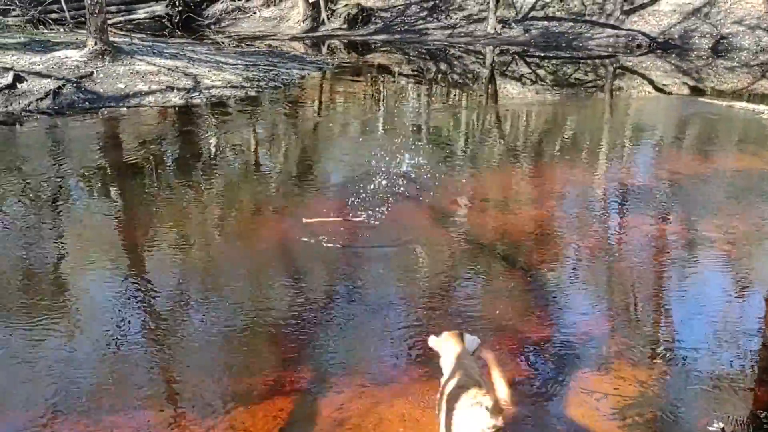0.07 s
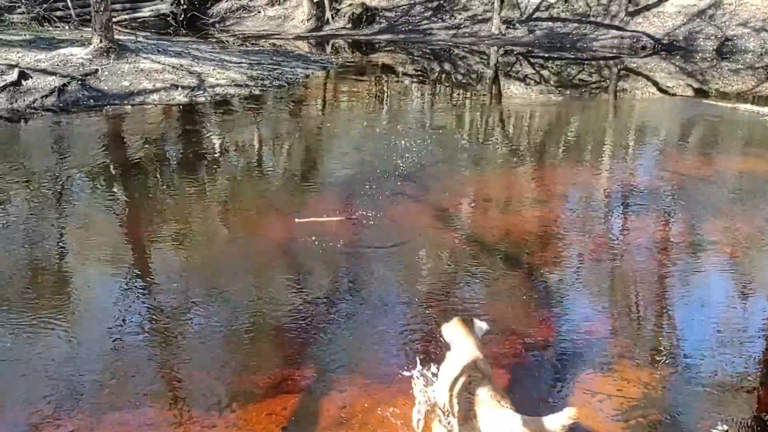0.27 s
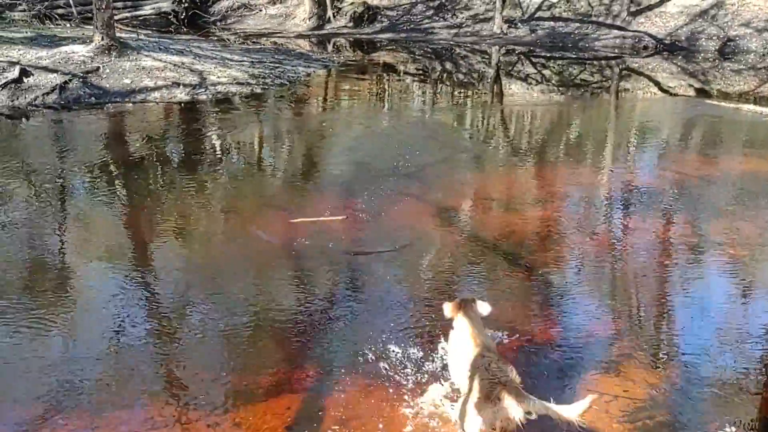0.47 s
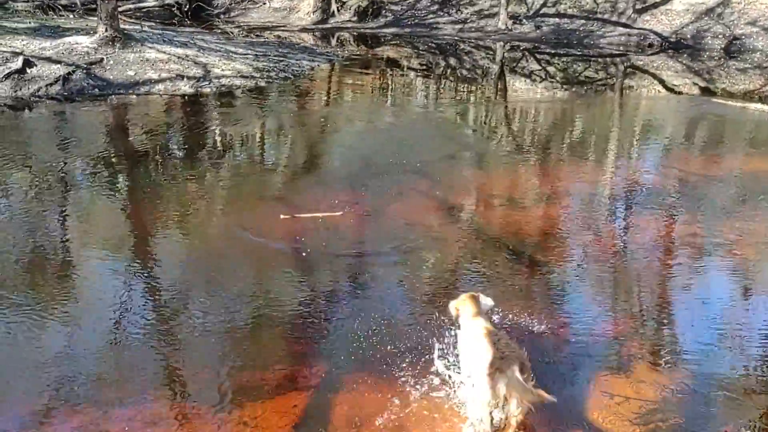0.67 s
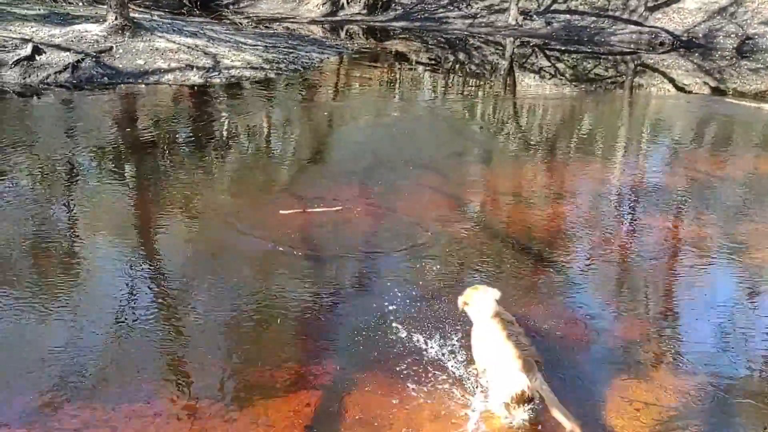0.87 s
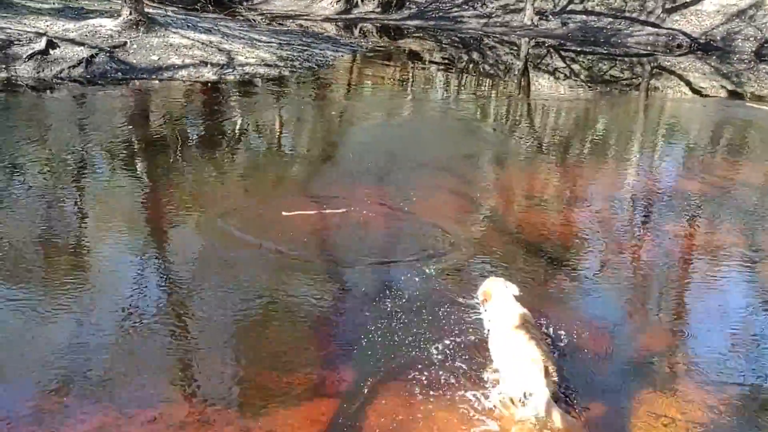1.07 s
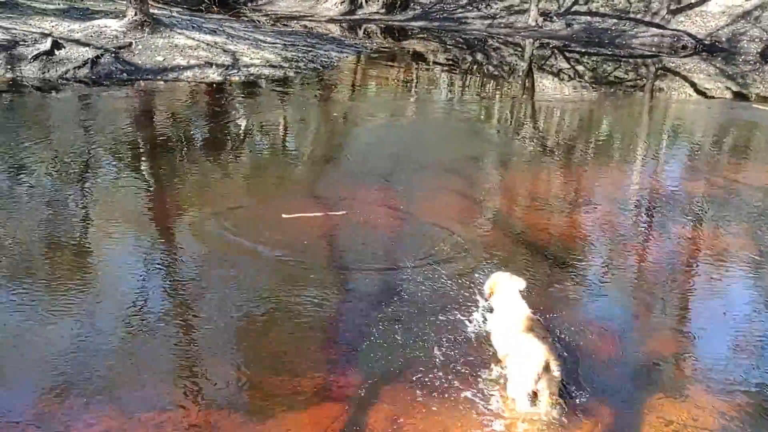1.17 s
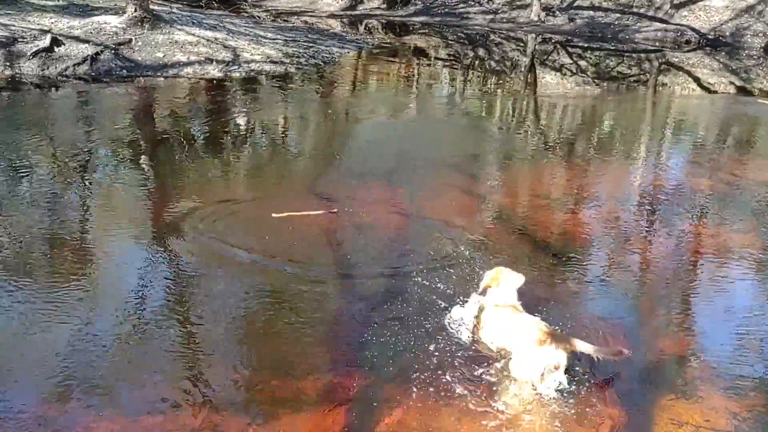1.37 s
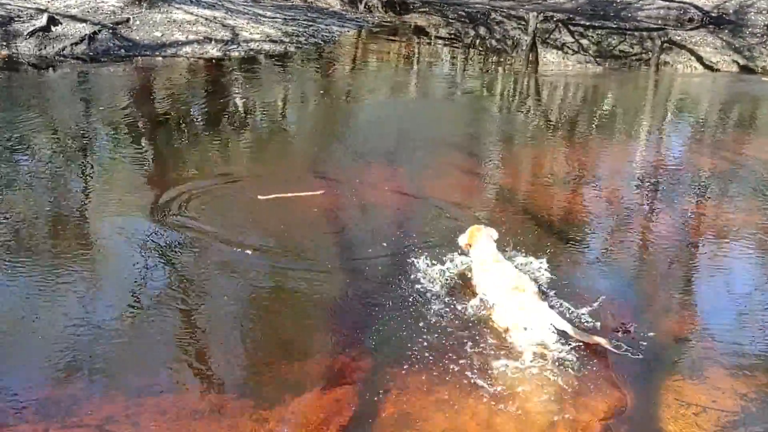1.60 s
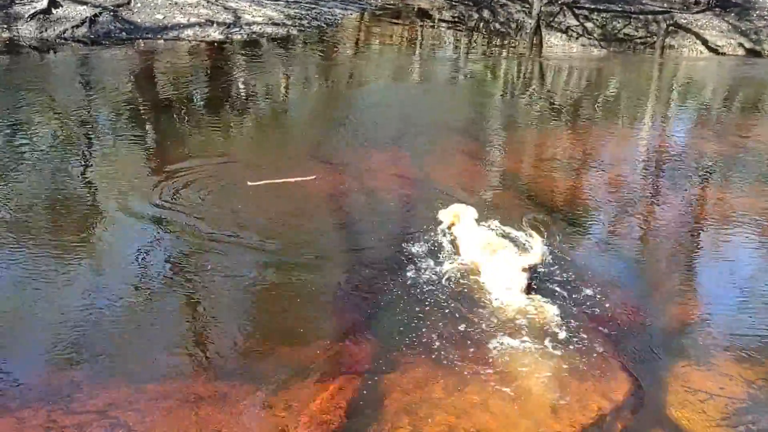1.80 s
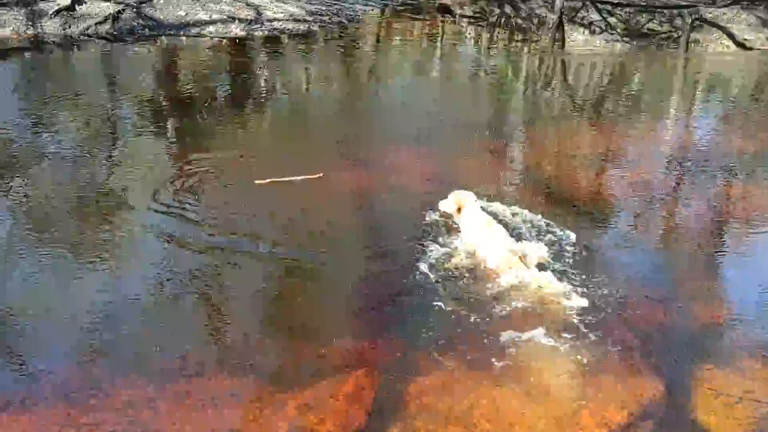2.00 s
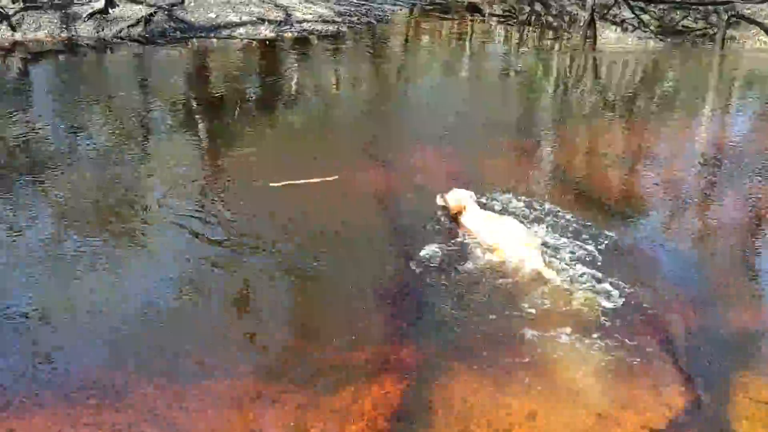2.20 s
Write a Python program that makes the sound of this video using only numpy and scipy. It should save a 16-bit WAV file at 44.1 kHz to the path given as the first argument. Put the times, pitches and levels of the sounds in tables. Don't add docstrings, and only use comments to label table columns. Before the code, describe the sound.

A dog splashes into a shallow river, one sharp smack first, then churning, bubbling paddling strokes

```python
import sys
import numpy as np
from scipy import signal
from scipy.io import wavfile

SR = 44100
rng = np.random.default_rng(int(sys.argv[2]) if len(sys.argv) > 2 else 0)


def volts_from_decibels(level):
    exponent = np.asarray(level, float) / 20
    return 10 ** exponent


def digitize_waveform(pressure):
    field = np.atleast_2d(pressure).T
    bounded = np.clip(field, -1, 1)
    quanta = np.round(bounded * 32767).astype(np.int16)
    wavfile.write(sys.argv[1], SR, quanta)


N = 99225

BUBBLE_RISE, BUBBLE_ONSET_CYCLES = 0.011, 2.24
CLEAR_RISE, CLEAR_ONSET_CYCLES = 0.0057, 1.18
SPLATTER_DB, SPLATTER_T60_S = -14.5, 0.33
POCKET_FADE = 1.39


def rms_one(x):
    return x / np.sqrt(np.mean(x ** 2) + 1e-20)


def band(x, low_hz, high_hz, order=2):
    return signal.sosfilt(signal.butter(order, [low_hz, high_hz], "band", fs=SR, output="sos"), x)


def drift(rate_hz):
    pole = np.exp(-2 * np.pi * rate_hz / SR)
    noise = rng.standard_normal(N + SR)
    smooth = signal.lfilter([1], [1, -2 * pole, pole * pole], noise)
    return rms_one(smooth[SR:])


def hiss(low_hz, high_hz, flicker_db, rate_hz):
    noise = rms_one(band(rng.standard_normal(N), low_hz, high_hz, order=3))
    return noise * volts_from_decibels(flicker_db * drift(rate_hz))


def add(out, s, grains):
    start = (np.asarray(s) * SR).astype(int)
    at = start[:, None] + np.arange(grains.shape[1])
    np.add.at(out, np.minimum(at, N), grains)


def ringing(s, db, hz, cycles, rise, onset, size, fade=1):
    out = np.zeros(N + 1)
    n = np.outer(hz, np.arange(size) / SR)
    swell = 1 - np.exp(-n / np.reshape(onset, (-1, 1)))
    decay = volts_from_decibels(-60 * (n / np.reshape(cycles, (-1, 1))) ** fade)
    shape = swell * decay
    shape /= shape.max(axis=1, keepdims=True)
    tone = np.sin(2 * np.pi * (n + rise * n * n / 2))
    add(out, s, volts_from_decibels(db)[:, None] * shape * tone)
    return out[:N]


def bursts(s, db, rise_s, t60, tail_db, tail_t60, low_hz=600, high_hz=9500):
    crackle_db, crackle_s = 3.5, 0.0011
    out = np.zeros(N + 1)
    t = np.arange(SR // 4) / SR
    decay = volts_from_decibels(-60 * t / t60[:, None]) + volts_from_decibels(tail_db - 60 * t / tail_t60)
    envelope = (1 - np.exp(-t / rise_s)) * decay
    envelope /= envelope.max(axis=1, keepdims=True)
    noise, lumps = rng.standard_normal((len(s), 2, len(t))).transpose(1, 0, 2)
    lumps = signal.lfilter([1], [1, -np.exp(-1 / (crackle_s * SR))], lumps)
    lumps = volts_from_decibels(crackle_db * rms_one(lumps))
    add(out, s, volts_from_decibels(db)[:, None] * band(envelope * lumps * noise, low_hz, high_hz))
    return out[:N]


def swarm(count, low_hz, high_hz, cycles, spread_db, size):
    u = rng.random((count, 4))
    s = u[:, 0] * N / SR
    hz = low_hz * (high_hz / low_hz) ** u[:, 1]
    db = -spread_db * np.log(u[:, 2] + 0.008)
    cycles = cycles * (0.5 + u[:, 3])
    return rms_one(ringing(s, db, hz, cycles, BUBBLE_RISE, BUBBLE_ONSET_CYCLES, size))


def stirred_water():
    # (time [s], spray falling back [dB], churn of bubbles [dB], fine mist [dB])
    stirring = [(0, -51.5, -59, -63), (0.192, -54, -73.5, -65.5), (0.221, -41.5, -54, -56.5),
                (.33, -50, -56, -62), (.36, -52.5, -70.5, -60), (.52, -50, -52.5, -58.5),
                (0.679, -45.5, -55.5, -54), (0.802, -49, -48, -60.5), (.94, -44.5, -47, -58.5),
                (1.231, -50.5, -46.5, -63.5), (1.27, -48, -52.5, -53.5), (1.401, -48, -42.5, -61),
                (1.45, -47, -42.5, -59.5), (1.66, -43.5, -43, -53), (1.83, -44, -40, -57.5),
                (1.87, -49.5, -43.5, -63), (1.96, -46.5, -42.5, -58.5), (2.25, -52, -51.5, -62)]
    s, *levels = np.transpose(stirring)
    spray, churn, mist = (volts_from_decibels(np.interp(np.arange(N) / SR, s, v)) for v in levels)

    fizz = swarm(count=3500, low_hz=1450, high_hz=4017, cycles=35, spread_db=2.3, size=900)
    foam = hiss(1120, 4350, flicker_db=1.5, rate_hz=27)
    falling = volts_from_decibels(-1) * fizz + volts_from_decibels(-5) * foam

    drops = swarm(count=4000, low_hz=3930, high_hz=8800, cycles=19, spread_db=4, size=300)
    fine = hiss(4700, 10000, flicker_db=2.6, rate_hz=37)
    misting = volts_from_decibels(5.5) * drops + volts_from_decibels(8.5) * fine

    crowd = swarm(count=1100, low_hz=421, high_hz=1135, cycles=16.2, spread_db=1, size=2000)
    slosh = swarm(count=400, low_hz=170, high_hz=464, cycles=5.9, spread_db=-2.5, size=2500)
    wash = hiss(392, 1196, flicker_db=1.5, rate_hz=19)
    churning = volts_from_decibels(-5) * crowd + volts_from_decibels(-16.5) * slosh + volts_from_decibels(-5) * wash
    return spray * falling + mist * misting + churn * churning


def droplets():
    # (time [s], peak level [dB], pitch [Hz])
    landings = [(.026, -41.5, 2610), (.215, -39, 1420), (.271, -34, 2460), (.293, -43, 1500),
                (.314, -38, 2580), (.39, -39.5, 2520), (.415, -46.5, 1450), (.526, -39, 2390),
                (.857, -44, 2460), (0.923, -36.5, 1450), (.935, -35, 1990), (.942, -36, 3090),
                (1.059, -38.5, 3050), (1.285, -37, 1890), (1.464, -37, 3050), (2.12, -46, 2020),
                (2.214, -44.5, 1330)]
    s, db, hz = np.transpose(landings)
    return ringing(s, db, hz, 56, CLEAR_RISE / 4, CLEAR_ONSET_CYCLES, size=1500)


def slaps():
    # (time [s], peak level [dB], pitch of the slap [Hz], dying time [ms])
    paw_hits = [(0.0273, -43.5, 2720, 35), (0.1056, -33, 2710, 35), (0.181, -42, 2960, 35),
                (0.2082, -26.5, 2720, 35), (0.315, -35.5, 2680, 35), (0.3654, -37, 2450, 35),
                (0.4574, -45, 3280, 35), (0.5562, -24.5, 2530, 35), (0.603, -31.5, 2250, 35),
                (0.6529, -33.5, 3220, 35), (0.683, -31, 2420, 35), (0.834, -34.5, 2410, 35),
                (0.9218, -36, 1900, 35), (1.1318, -33, 2990, 35), (1.2557, -30, 3420, 35),
                (1.3026, -43.5, 3200, 35), (1.433, -29.5, 2290, 35), (1.454, -30, 3120, 35),
                (1.4744, -32.5, 2400, 35), (1.4905, -32.5, 2190, 35), (1.604, -33.5, 2180, 35),
                (1.6416, -28.5, 2540, 35), (1.6729, -31, 2190, 35), (1.8266, -34, 2150, 35),
                (1.896, -36, 2830, 35), (1.941, -32.5, 2100, 35), (1.9607, -32.5, 2200, 35),
                (2.1221, -38, 2000, 35)]
    s, db, hz, ms = np.transpose(paw_hits)
    ring_t60_s = 0.0085
    noise = bursts(s, db - 3, 0.0025, ms / 1000, SPLATTER_DB, SPLATTER_T60_S, low_hz=1000)
    ring = ringing(s, db - 6, hz, ring_t60_s * hz, 0, BUBBLE_ONSET_CYCLES, size=1500)
    return noise + ring


def ticks():
    # (time [s], peak level [dB])
    strikes = [(0.074, -36.5), (0.136, -37.5), (0.391, -34), (0.527, -42), (0.597, -32.5), (0.642, -43),
               (0.75, -31), (0.856, -32), (0.903, -37), (0.92, -29.5), (0.996, -35), (1.028, -35),
               (1.072, -28), (1.392, -38.5), (1.64, -35), (1.651, -25), (1.66, -23.5), (1.671, -25),
               (1.723, -32), (1.825, -21.5), (1.96, -33), (2.002, -38), (2.05, -30), (2.23, -35)]
    s, db = np.transpose(strikes)
    splatter = bursts(s, db - 7.5, 0.00021, 0.008 + 0 * s, tail_db=-9.5, tail_t60=0.05,
                      low_hz=700, high_hz=4500)
    hz = 1720 * rng.uniform(0.64, 1.53, len(s))
    kick = ringing(s, db - 2, hz, cycles=3.5, rise=0, onset=0.16, size=300)
    return splatter + kick


def bubbles():
    # (time [s], peak level [dB], pitch [Hz], ringing time [cycles])
    singles = [(0.208, -32.5, 1000, 18), (0.228, -30, 920, 20), (0.283, -42, 894, 20),
               (0.311, -35.5, 1470, 21), (0.492, -45, 555, 36), (0.597, -33, 1440, 54),
               (0.626, -32.5, 1390, 17), (0.66, -33.5, 967, 33), (0.757, -39, 623, 20),
               (0.819, -36.5, 927, 13), (0.868, -34.5, 499, 17), (0.9, -37, 1020, 21),
               (0.92, -28.5, 830, 6.9), (0.934, -29, 850, 10), (0.946, -36, 930, 10), (1.057, -35, 950, 21),
               (1.187, -36, 896, 22), (1.241, -34, 810, 9.4), (1.34, -34.5, 1415, 35),
               (1.374, -41, 488, 22), (1.402, -35, 515, 20), (1.632, -31, 530, 20), (1.647, -31.5, 670, 39),
               (1.67, -30.5, 880, 7), (1.761, -37.5, 972, 70), (1.808, -29, 567, 9.4),
               (1.825, -35.5, 700, 16), (1.877, -33.5, 408, 7.1), (1.964, -34, 605, 5.9),
               (2.071, -38, 744, 8.2), (0.104, -51.5, 1000, 13), (0.183, -41.5, 2910, 41),
               (.587, -41.5, 954, 20), (.623, -39, 780, 18), (1.004, -45.5, 974, 32),
               (1.026, -39, 910, 7.2), (1.077, -40.5, 2860, 74), (1.093, -43.5, 509, 34),
               (1.28, -37.5, 860, 16), (1.375, -39.5, 1010, 33), (1.489, -32.5, 1375, 33),
               (1.66, -35.5, 817, 15), (1.69, -36, 402, 13), (1.735, -38.5, 923, 32), (1.947, -38, 434, 11),
               (1.966, -38, 1750, 30), (2.145, -39, 1315, 38), (2.173, -44, 795, 18), (2.226, -49, 886, 23)]
    # (time [s], peak level [dB], pitch [Hz], ringing time [cycles])
    tiny_drop = [
        (1.0256, -25, 5480, 28),
    ]
    brood_db, brood_s, brood_octaves = -9.5, 0.017, 0.87
    s, db, hz, cycles = np.transpose(singles)
    start_hz = hz / (1 + 5 * CLEAR_RISE)
    out = ringing(s, db, start_hz, cycles, CLEAR_RISE, CLEAR_ONSET_CYCLES, size=3000)
    for delay, weakness, smallness in rng.random((len(s), 4, 3)).transpose(1, 2, 0):
        brood_hz = hz * 2 ** (brood_octaves * (2 * smallness - 0.7))
        out += ringing(s + brood_s * delay, db + brood_db * (0.5 + weakness), brood_hz,
                       cycles, BUBBLE_RISE, BUBBLE_ONSET_CYCLES, size=2000)
    return out + ringing(*np.transpose(tiny_drop), 0, BUBBLE_ONSET_CYCLES, size=1000)


def gulps():
    # (time [s], peak level [dB], pitch [Hz], decay time T60 [s])
    pockets = [(0.236, -45.5, 117, 0.063), (0.283, -50, 296, .1), (.455, -50, 153, 0.02),
               (.42, -59, 260, .05), (0.599, -47, 220, 0.061), (.685, -59, 151, .05),
               (.622, -43, 156, 0.079), (0.821, -34.5, 252, 0.048), (0.991, -48.5, 250, 0.06),
               (1.131, -48.5, 259, 0.05), (1.302, -39, 103.7, 0.2), (1.3, -40, 226, 0.023),
               (1.438, -46.5, 149, 0.041), (1.489, -40, 206, 0.012), (1.579, -36.5, 195, 0.078),
               (1.626, -36.5, 218, 0.03), (1.67, -36.5, 250, 0.023), (1.7, -51.5, 150, 0.012),
               (1.821, -42, 250, 0.065), (1.876, -40.5, 235, 0.024), (1.948, -41.5, 170, 0.022),
               (2.046, -46.5, 170, 0.039), (1.99, -48.5, 150, 0.033), (1.925, -44, 230, 0.035),
               (2.088, -51, 260, 0.045), (2.16, -49.5, 303, 0.037)]
    # (time [s], peak level [dB], pitch [Hz], decay time T60 [s])
    shrinking = [
        (0.554, -40, 163, .075),
    ]
    onset_s = 0.0019
    s, db, hz, t60 = np.transpose(pockets)
    thuds = bursts(s, db + 9, onset_s, 0.065 + 0 * s, SPLATTER_DB, SPLATTER_T60_S, low_hz=200, high_hz=1420)
    rings = ringing(s, db, hz, t60 * hz, 0.0057, onset_s * hz, size=12000, fade=POCKET_FADE)
    s, db, hz, t60 = np.transpose(shrinking)
    climbing = ringing(s, db, hz, t60 * hz, 0.047, 0.0033 * hz, size=6000, fade=2.54)
    return thuds + rings + climbing


def smack():
    # (pitch [Hz], level [dB], decay time T60 [ms])
    smack_modes = [
        (1150, -23, 16),
        (2140, -13.5, 8.1),
        (2520, -21.5, 15),
        (3050, -24.5, 12),
        (5900, -10, 4.4),
        (7040, -27, 9.7),
        (7600, -26, 16.6),
    ]
    hit_s, rise_s = 0.2422, 0.0011
    hz, db, ms = np.transpose(smack_modes)
    crack = bursts(np.array([hit_s]), np.array([-12.5]), rise_s, np.array([0.0085]),
                   tail_db=-23.5, tail_t60=0.17, low_hz=900, high_hz=7800)
    rings = ringing(hit_s + 0 * hz, db, hz, ms / 1000 * hz, 0, rise_s * hz, size=2000, fade=POCKET_FADE)
    return crack + rings


def near_paths(water):
    # (time [s], first delay [ms], its level [dB], second delay [ms], its level [dB])
    paths = [
        (0, 1.02, -29, 1.974, -13.5),
        (1.101, 1.342, -15.5, 2.11, -13),
        (2.25, 1.4, -12.5, 2.42, -19.5),
    ]
    s, *columns = np.transpose(paths)
    n = np.arange(N)
    ms_a, db_a, ms_b, db_b = (np.interp(n / SR, s, c) for c in columns)
    first = volts_from_decibels(db_a) * np.interp(n - ms_a * SR / 1000, n, water)
    second = volts_from_decibels(db_b) * np.interp(n - ms_b * SR / 1000, n, water)
    return first + second


def bank_echoes(water):
    # (delay [s], level [dB])
    bank = [
        (.011, -24),
        (.027, -29),
    ]
    dull = band(water, 260, 3800, order=1)
    return sum(volts_from_decibels(db) * np.pad(dull, (int(s * SR), 0))[:N] for s, db in bank)


def woods_air():
    return volts_from_decibels(-69.5) * rms_one(band(rng.standard_normal(N), 25, 250, order=1))


def scene():
    water = stirred_water() + droplets() + slaps() + ticks() + bubbles() + gulps() + smack()
    return (water + near_paths(water) + bank_echoes(water) + woods_air())[None]


def band_limit(x):
    return signal.sosfilt(signal.butter(12, 9040, fs=SR, output="sos"), x)


def record(dry):
    # (centre [Hz], width [Hz], gain [dB])
    housing = [
        (396, 110, -3),
        (1120, 270, -0.5),
        (3014, 930, 5.5),
        (3730, 170, 4.5),
        (4217, 957, -14),
        (5040, 1670, -5.5),
        (5860, 370, -3),
        (7450, 1800, 4),
    ]
    x = signal.sosfilt(signal.butter(2, 77.5, "high", fs=SR, output="sos"), dry)
    x = signal.lfilter(*signal.butter(1, 3740, fs=SR), x)
    for hz, width_hz, db in housing:
        w = 2 * np.pi * hz / SR
        a = np.sqrt(volts_from_decibels(db))
        k = np.sin(w) * width_hz / hz / 2
        middle = -2 * np.cos(w)
        x = signal.lfilter([1 + k * a, middle, 1 - k * a], [1 + k / a, middle, 1 - k / a], x)
    mix = signal.sosfilt(signal.cheby2(12, 68, 9100, fs=SR, output="sos"), x)
    return band_limit(mix)


dry = scene()
out = record(dry)
digitize_waveform(out)
```